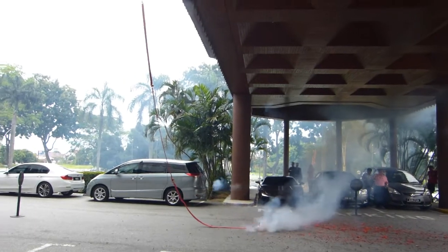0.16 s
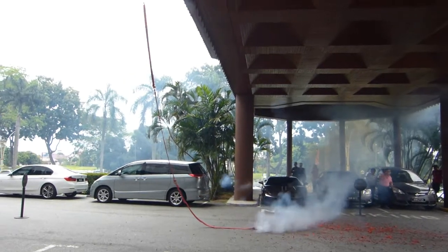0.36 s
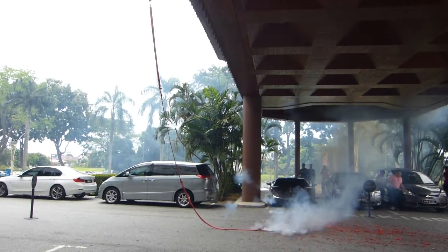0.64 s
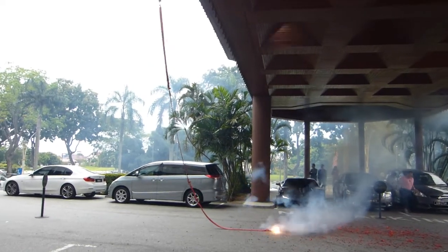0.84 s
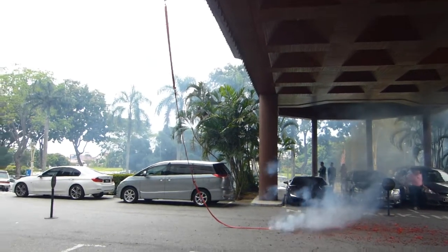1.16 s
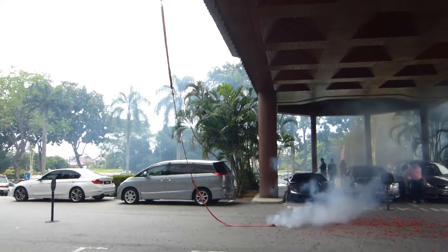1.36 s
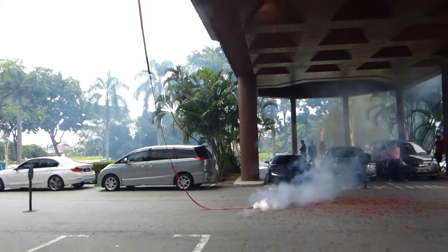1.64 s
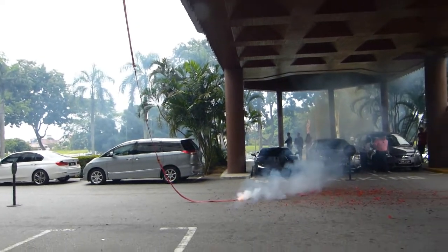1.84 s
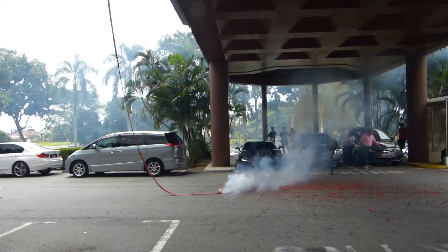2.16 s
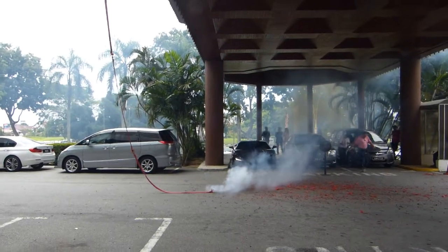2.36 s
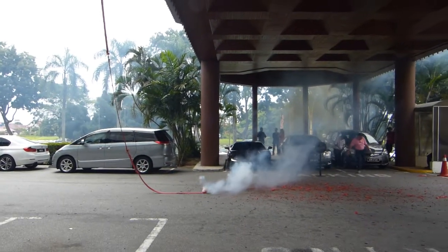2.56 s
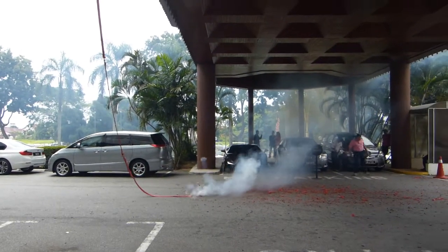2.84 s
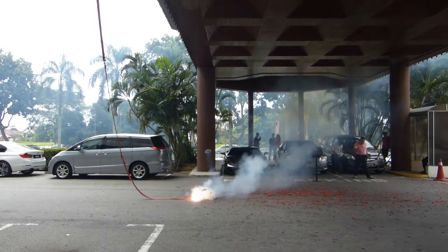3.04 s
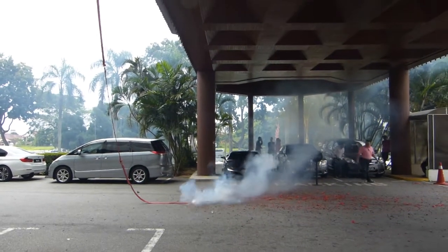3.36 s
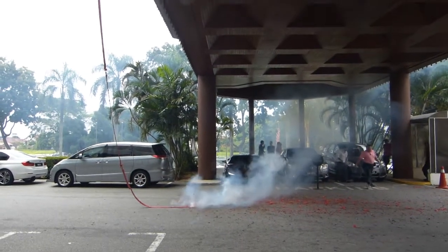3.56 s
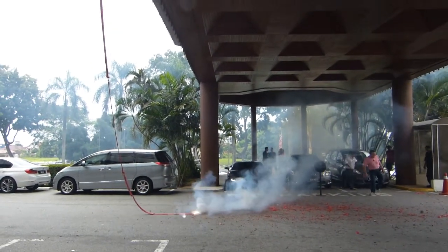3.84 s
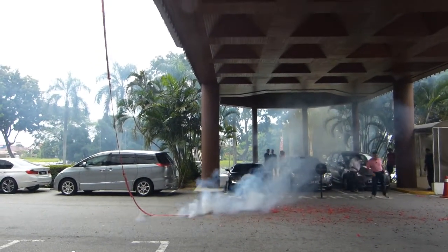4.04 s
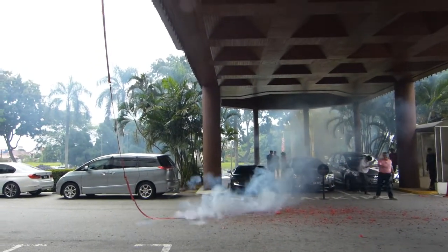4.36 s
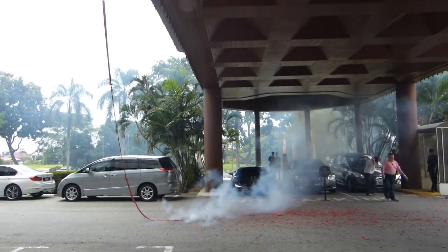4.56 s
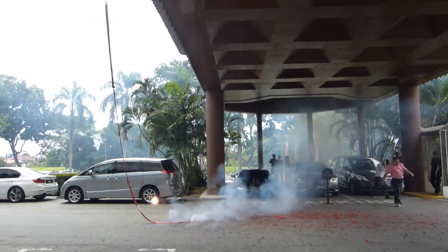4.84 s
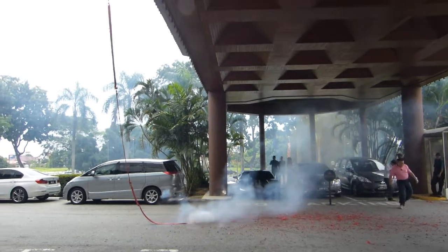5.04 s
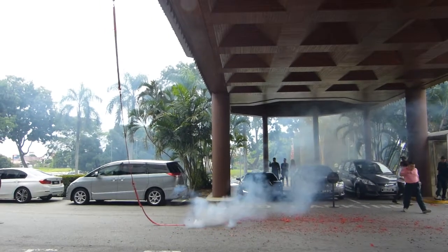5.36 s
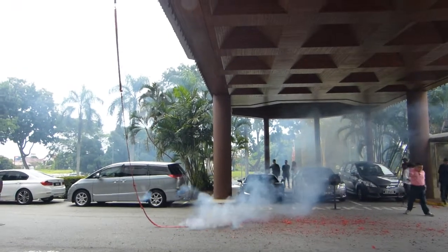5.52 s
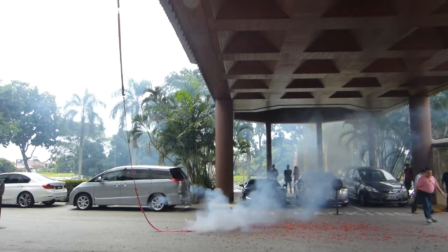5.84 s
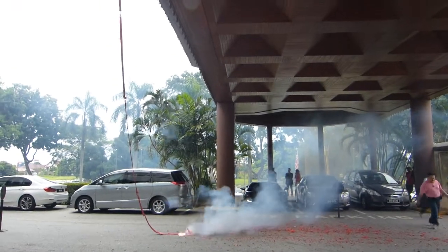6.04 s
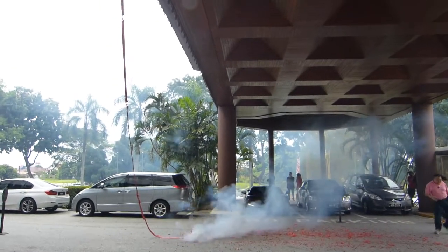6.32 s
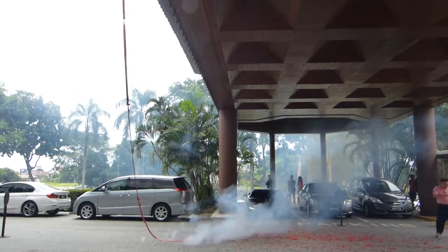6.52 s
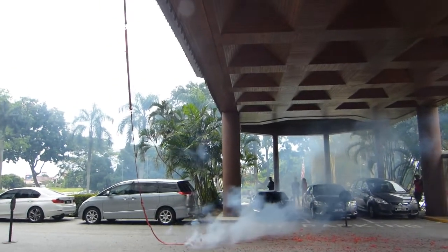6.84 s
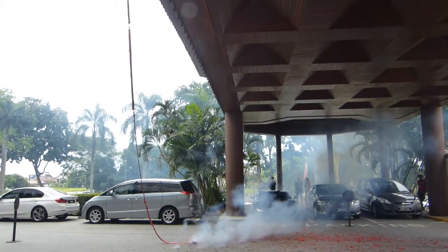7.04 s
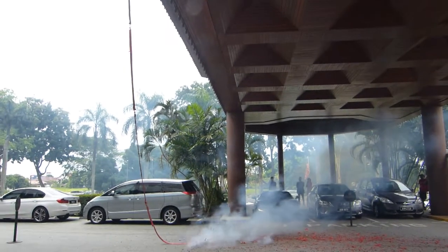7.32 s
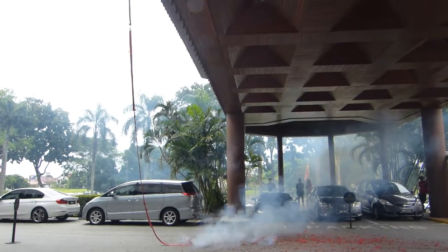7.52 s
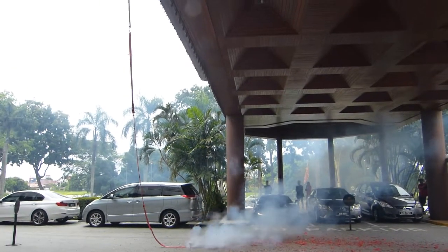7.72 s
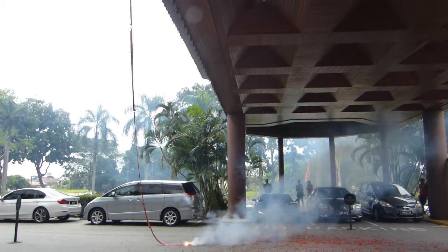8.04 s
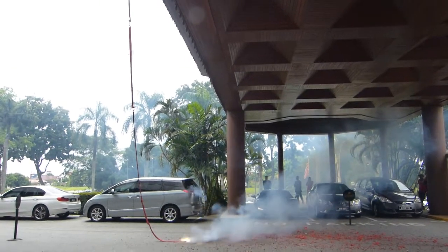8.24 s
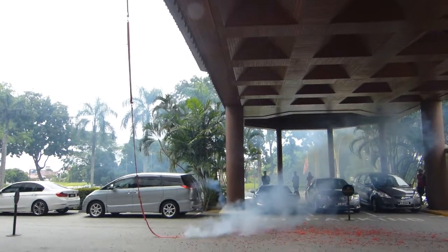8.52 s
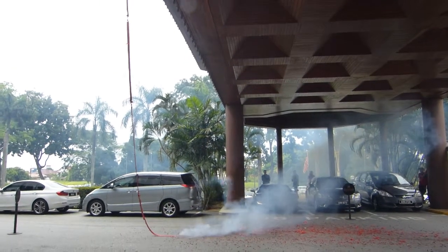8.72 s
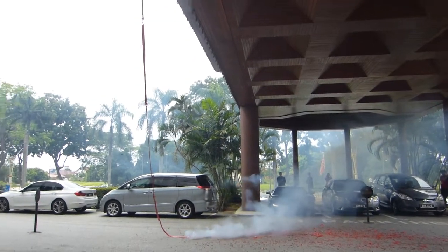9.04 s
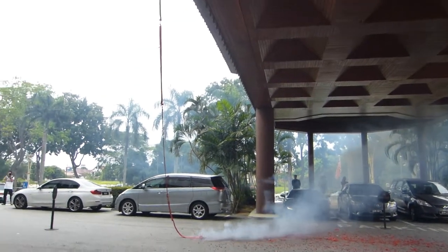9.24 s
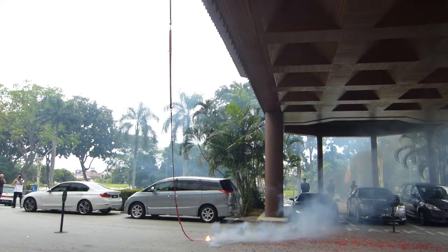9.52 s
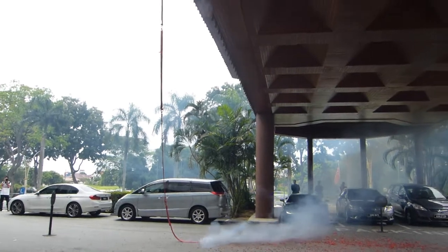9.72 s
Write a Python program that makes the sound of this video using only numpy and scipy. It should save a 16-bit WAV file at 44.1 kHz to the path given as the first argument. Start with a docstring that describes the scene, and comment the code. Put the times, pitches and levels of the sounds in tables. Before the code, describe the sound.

Firecrackers go off one after another on tarmac beneath a concrete porch, some metres from a stereo camera. The bangs are dense and uneven, roughly twenty a second, some paired or clustered, some much louder. Each sharp crack is followed at once by a hard roof slap and a short bright reverberation. The rattle is already going at the start and never stops.

```python
"""A string of firecrackers burns on the tarmac under a concrete porch roof, some metres from a stereo camera.
Each cracker sends an N-shaped shock: straight, off the ground and cars, off the roof, off its coffers and the
far wall. The porch and forecourt ring on as noise that dies band by band, over a faint low noise floor.
The difference of the camera's two ports widens the bass; the camera rounds the loudest peaks and cuts the top."""
import sys
import numpy as np
from scipy import signal
from scipy.fft import rfft, irfft
from scipy.io import wavfile
from scipy.ndimage import uniform_filter1d

SR = 44100
rng = np.random.default_rng(int(sys.argv[2]) if len(sys.argv) > 2 else 0)


def digitize_waveform(pressure):
    """Quantize a signal to 16-bit integers and store it at the path in sys.argv[1].

    Rows of a 2-D input are taken as channels; values are limited to [-1, 1].
    """
    field = np.atleast_2d(pressure).T
    bounded = np.clip(field, -1, 1)
    quanta = np.round(bounded * 32767).astype(np.int16)
    wavfile.write(sys.argv[1], SR, quanta)


N = 435708
LEAD = SR // 4  # samples computed ahead of the start, for crackers that still ring then


def undb(db):
    """Turns a level in dB into a gain."""
    return 10 ** (np.asarray(db, float) / 20)


def colour(x, table):
    """Causal (minimum-phase) filter with the gain of (Hz, dB) points, from the folded cepstrum."""
    hz, db = np.transpose(table)
    size = 4096
    bins_hz = np.arange(1, size // 2 + 2) * SR / size
    log_gain = np.log(undb(np.interp(np.log(bins_hz), np.log(hz), db)))
    # folding the cepstrum onto positive times makes the response causal
    cepstrum = irfft(log_gain)
    cepstrum[1:size // 2] *= 2
    cepstrum[size // 2 + 1:] = 0
    response = irfft(np.exp(rfft(cepstrum)))
    return signal.fftconvolve(x, response)[:len(x)]


def crackers():
    """Every cracker and the smaller neighbour that it lights: time, strength, treble, straight crack."""
    # one row per cracker; the first rows go off before the start and still ring:
    # t/s, strength level/dB, treble against body level/dB, straight crack level/dB
    bangs = [(-.16,-16,0,-9),(-.09,-18,0,-9),(-.05,-8.5,1,-5),(-.02,-13,-6,-11),(.0018,-17.5,-0.5,-12),(0.0158,-17,-3,-9),(0.0396,-15.5,-4,-15),(0.0583,-14.5,-2.5,-10),(0.0963,-17.5,2,-11),(0.1242,-15,0.5,-6),(0.166,-24,2,-9),(0.1915,-14,-2.5,-9),(.2084,-17,0,-9),(.279,-15,-2,-9),(0.2977,-15,-1,-9),(0.325,-17,-2,-10),(0.3289,-16.5,2,-9),(0.3904,-11.5,-1,-8),(0.409,-19,0.5,-11),(.4335,-16.5,1.5,-8),(0.5071,-18.5,4.5,-6),(.5967,-13,-3.5,-10),(0.6174,-24,-3,-11),(0.659,-12,0,-15),(0.6679,-20,-7,-15),(0.6944,-13,-2,-8),(0.7056,-19,2,-9),(0.716,-19,-3,-11),(0.7211,-17.5,1,-6),(.7484,-27,9,-10),(0.8543,-14.5,-1.5,-7),(0.9433,-16,-0.5,-7),(.9702,-15,-2.5,-8),(.9898,-19,1,-9),(1.0959,-13.5,-1,-7.5),(1.1317,-24,8,-11),(1.1413,-11.5,-4,-5),(1.2299,-19,5,-10),(1.2403,-17,-1,-6),(1.3856,-13.5,0,-6),(1.4074,-12.5,-4.5,-12),(1.4165,-17.5,1,-11),(1.518,-14.5,-4.5,-3.5),(1.5745,-18.5,1.5,-7),(1.6847,-16,1.5,-7.5),(1.7241,-18,3,-10),(1.7338,-18.5,-6,-13),(1.7432,-12.5,-7,-5),(1.7652,-21,-3,-14),(1.8869,-17.5,1,-5),(2.0764,-16.5,2.5,-5.5),(2.1532,-10.5,-4,-6),(2.2946,-13.5,-5,-6),(2.3168,-20.5,2.5,-11),(2.4193,-15.5,-0.5,-9),(2.4662,-16.5,-0.5,-5),(2.502,-20,1,-18),(2.5641,-20.5,4,-9),(2.5806,-17,-1.5,-10),(2.6735,-29,11,-19),(2.698,-22.5,5,-23),(2.7335,-23.5,7.5,-11.5),(2.7507,-16,3.5,-11),(2.7788,-20,3,-12),(2.7934,-13.5,-1,-6),(2.8456,-23,6.5,-14),(2.8881,-18.5,4.5,-11),(2.9172,-18.5,1,-13),(2.9621,-19,4,-11),(3.0141,-7.5,-5.5,-7),(3.0281,-18,-7,-5),(3.0351,-21,-3,-11),(3.1349,-11.5,-3,-4),(3.1893,-20,3,-8),(3.209,-8,-3,-3),(3.2357,-18.5,2,-5),(3.2637,-18,0,-11),(3.3234,-16.5,-2,-6),(3.3543,-18.5,0.5,-16),(3.3602,-16.5,-1,-11),(3.3836,-33,-3,-18),(3.4768,-22.5,-5,-8),(3.538,-16,.5,-3.5),(3.5709,-11,-2.5,-11),(3.5905,-19,-5,-8),(3.8299,-13.5,-2.5,-4),(3.912,-17.5,2.5,-8),(3.9279,-14,-2,-8),(4.0067,-14.5,-1.5,-4),(4.044,-21,6.5,-9),(4.0573,-21.5,1,-9),(4.2037,-19.5,5,-7),(4.2106,-13.5,-0.5,-9),(4.2457,-15.5,3.5,-3),(4.2672,-18.5,4.5,-10),(4.3026,-19,5,-17),(4.3185,-11.5,-5,-19),(4.3291,-13.5,-0.5,-5),(4.3985,-25,0,-7),(4.4051,-20,0,-13),(4.5078,-17,1,-3.5),(4.5272,-18.5,1,-6),(4.6248,-15.5,1.5,-4),(4.6303,-21,6.5,-14),(4.6474,-22,1,-7),(4.8249,-21,5.5,-7),(4.8555,-16,1.5,-6),(4.8648,-17,3,-10),(4.9373,-17.5,1,-10),(4.9841,-16,-.5,-8),(5.0292,-16,2,-3),(5.1359,-16,-1,-6.5),(5.1676,-22.5,5.5,-8.5),(5.216,-14.5,1,-7),(5.2384,-16.5,0,-5),(5.2482,-18,-5,-4),(5.325,-12.5,-0.5,-9),(5.3294,-23,2,-7),(5.3485,-13.5,-1,-11),(5.4774,-16,-1.5,-4),(5.4818,-12,-2.5,-4),(5.5132,-15,3.5,-9),(5.526,-21,2,-10),(5.5548,-19,1,-5),(5.566,-19.5,2,-9),(5.6203,-17.5,6,-10),(5.6433,-19,4,-14),(5.6945,-17.5,1,-10),(5.8625,-17.5,2.5,-4.5),(5.8797,-19.5,1.5,-8),(5.9005,-19,3.5,-8),(5.9238,-21.5,12,-8),(5.9636,-13.5,-4.5,-3.5),(6.0948,-16,-0.5,-7.5),(6.1162,-18.5,-0.5,-13),(6.1393,-18,-2,-6),(6.1835,-20.5,7,-16),(6.2387,-14,-0.5,-9),(6.2421,-18.5,2,-9),(6.3352,-18,0.5,-7),(6.3402,-19,0,-7),(6.442,-22,4,-22),(6.4793,-15.5,3.5,-7.5),(6.492,-22,6,-13),(6.516,-24,2,-17),(6.5558,-17.5,1,-5),(6.588,-20,-1,-7),(6.7918,-21,3.5,-11.5),(6.8254,-13.5,-1,-7),(6.8715,-20,2.5,-14),(6.902,-15,2.5,-4),(6.9912,-17,2.5,-9),(7.0541,-18.5,0,-7),(7.1145,-16.5,2,-5),(7.1572,-16,1.5,-6),(7.1706,-11.5,-0.5,-10),(7.2422,-17.5,2.5,-10),(7.251,-14.5,-3,-16),(7.2815,-15,2,-6),(7.3104,-24,4,-11),(7.38,-20,5.5,-10),(7.4336,-20,6,-6),(7.46,-20,1,-8),(7.506,-17,3,-18),(7.5163,-23,1.5,-8),(7.543,-16.5,0,-4),(7.6671,-12.5,-1.5,-5),(7.6795,-17.5,2,-3),(7.7231,-16.5,1,-5.5),(7.8979,-29,2,-24),(7.9687,-16,2.5,-4),(7.989,-18.5,3,-5),(8.088,-23,-1,-24),(8.1372,-14,-4.5,-5),(8.1562,-18.5,6,-7),(8.1891,-17.5,1.5,-10),(8.1943,-20,0,-5),(8.2181,-20.5,3,-7),(8.3362,-16.5,1,-4),(8.368,-21,2,-6),(8.412,-19,1.5,-4),(8.4834,-22,4,-6),(8.526,-20.5,3.5,-6),(8.563,-19,2,-3),(8.6321,-21.5,2,-8),(8.6392,-22.5,8.5,-9),(8.7037,-22,7,-9),(8.7656,-14.5,1,-6),(8.9259,-19.5,1.5,-26),(8.964,-19,3,-5.5),(8.9771,-14.5,0,-6),(9.024,-20,2,-8),(9.0663,-15,-2.5,-5),(9.153,-22.5,6.5,-8),(9.1912,-17,1.5,-17),(9.2123,-20,6,-8),(9.2433,-14,-5,-6),(9.2634,-24,5.5,-8),(9.3087,-21,5.5,-6),(9.3411,-21.5,1,-14),(9.4406,-16.5,3.5,-9),(9.4699,-18,-2,-11),(9.4972,-16,5,-12),(9.6145,-18,0.5,-9),(9.7418,-23,0,-15),(9.834,-14.5,2,-4.5),(9.8593,-21.5,-3,-8)]
    mean_wait_ms, neighbour_db, neighbour_scatter_db = 5, -12.5, 4
    s, db, treble_db, crack_db = np.transpose(bangs)
    wait_s = mean_wait_ms / 1000 * rng.exponential(size=len(s))
    less_db = neighbour_db + neighbour_scatter_db * rng.standard_normal(len(s))
    all_s = np.r_[s, s + wait_s]
    all_db = np.r_[db, db + less_db]
    all_treble_db = np.r_[treble_db, treble_db]
    all_crack_db = np.r_[crack_db, crack_db + .7 * less_db]
    return all_s, all_db, all_treble_db, all_crack_db


def shocks(s, db, group, count):
    """N-waves of one group of paths, mid and side: a jump down, a bowed ramp up, a jump back into suction."""
    typical_length_ms, bow = .36, 1.6
    front, front_ms = .8, .06  # depth of the first jump and its decay
    suction, suction_ms = .6, .3  # depth after the last jump and its decay
    after_ms, spread_ms, path_db, edge_ms, scatter_db, side = group
    chance = rng.standard_normal((len(s), 4 * count)).reshape(-1, 4).T
    late, longer, louder, aside = chance
    length = typical_length_ms * np.exp(.13 * longer)[:, None]

    # the last jump of each wave marks its arrival
    end = LEAD + (np.repeat(s, count) + (after_ms + spread_ms * late) / 1000) * SR
    gain = undb(np.repeat(db, count) + path_db + scatter_db * louder)
    place = end.astype(int)[:, None] + np.arange(-32, 64)
    t = (place - end[:, None]) * 1000 / SR + length  # ms since the first jump

    begun = (1 + np.tanh(t / edge_ms)) / 2
    over = (1 + np.tanh((t - length) / edge_ms)) / 2
    ramp = np.clip(t / length, 0, 1) ** bow - front * np.exp(-np.abs(t) / front_ms)
    tail = suction * np.exp(-np.abs(t - length) / suction_ms)
    wave = gain[:, None] * ((begun - over) * ramp - over * tail)

    # single paths keep their bearing, scattered ones come from either side
    bearing = side * (1 + .5 * aside) if count == 1 else side * aside
    place = np.clip(place, 0, LEAD + N).ravel()
    mid_and_side = (wave, wave * bearing[:, None])
    return np.array([np.bincount(place, w.ravel(), LEAD + N + 1)[:-1] for w in mid_and_side])


def hollow(x):
    """The hollow coffers ring briefly when the roof echo strikes them: a short decaying sine is added."""
    pitch_hz, t60_ms, level_db = 1425, 6.2, -23.5
    t = np.arange(SR // 20) / SR
    ring = np.sin(2 * np.pi * pitch_hz * t) * undb(level_db - 60000 * t / t60_ms)
    return x + signal.fftconvolve(x, ring[None])[:, :x.shape[1]]


def all_shocks(s, db, treble_db, straight_db):
    """Shocks along every path from the string to the microphones: whole ones and scattered ones, mid and side."""
    # groups of arrivals: after their reference t/ms, spread t/ms, path level/dB, edge t/ms,
    # scatter level/dB, side share [ratio]
    straight = (0.08, 0.0031, 1.4, 0.023, 0, -0.62)
    ground_cars = (1.8, 0.483, 1.3, 0.02, 2.1, 1.3)
    roof = (.09, 0, 3.5, .07, 0, -.1)
    roof_edges = (1.7, 0.83, 1.4, 0.015, 5, 1.4)
    coffers = (0.386, 0.73, 4.1, 0.017, 4.2, 0.41)
    far_wall = (31.5, 2.5, 1.5, .04, 4, .2)
    # echoes come sooner as the fire creeps along the string: t/s, roof lag t/ms, coffer lag t/ms
    lags = [(0, 7.7, 14.5), (1.5, 7.68, 14.6), (2.5, 7.53, 14.4), (4.5, 7.32, 13.4), (9.9, 7.27, 13.1)]
    # small surfaces throw back mostly treble: f/Hz, level/dB
    small_surfaces = [(100, -12.5), (500, -3.5), (1500, -10), (3000, -0.5), (4100, 1), (8000, 3.5),
                      (12000, 1.5)]
    roof_lag_scatter_ms = .07
    roof_base_db, roof_growth_db_per_s, roof_scatter_db = 0.5, 0.27, 2.5

    # the roof echo grows along the string as the fire nears
    roof_db = (db + straight_db) / 2 + roof_base_db + roof_growth_db_per_s * s
    roof_db = roof_db + roof_scatter_db * rng.standard_normal(len(s))
    when, roof_ms, coffer_ms = np.transpose(lags)
    # the roof lag varies a little from cracker to cracker
    roof_lag_ms = np.interp(s, when, roof_ms) + roof_lag_scatter_ms * rng.standard_normal(len(s))
    roof_s = s + roof_lag_ms / 1000
    coffer_s = s + np.interp(s, when, coffer_ms) / 1000
    sharp_db = db + treble_db

    whole = shocks(s, straight_db, straight, count=1)
    whole += hollow(shocks(roof_s, roof_db, roof, count=1))
    broken = shocks(s, sharp_db, ground_cars, count=5)
    broken += shocks(roof_s, sharp_db, roof_edges, count=5)
    broken += shocks(coffer_s, sharp_db, coffers, count=5)
    broken += shocks(s, db, far_wall, count=8)
    return whole + np.array([colour(v, small_surfaces) for v in broken])


def space():
    """Response of porch and forecourt from one spot: echoes thicken to noise, each band dies at its rate."""
    # decay by band: f/Hz, t60 under the roof t/s, t60 of the forecourt t/s
    decay = [(113, 0.062, 0.082), (185, 0.25, 0.3), (370, 0.42, 2.2), (690, 0.45, 1.42), (1310, 0.48, 1.13),
             (3000, 0.26, 1.1), (6450, 0.43, 1.17), (12000, 0.36, 0.59)]
    forecourt_db, build_ms = -10, 7.85
    sparse_db, dense_ms = 7.5, 46  # early unevenness of the echoes, and how fast it evens out
    patchy_db = 2.5
    t = np.arange(SR) / SR
    echoes, uneven = rng.standard_normal((2, SR))
    x = echoes * undb(sparse_db * np.exp(-t * 1000 / dense_ms) * uneven)
    build_up = 1 - np.exp(-t * 1000 / build_ms)
    x *= build_up / np.sqrt(uniform_filter1d(x ** 2, size=3000))

    # each spot favours other pitches, in patches a third of an octave wide
    log_f = np.log(np.arange(1, SR // 2 + 2))
    patches = np.linspace(np.log(200), np.log(12000), num=18)
    favour = rng.standard_normal(len(patches))
    spectrum = rfft(x) * undb(patchy_db * np.interp(log_f, patches, favour))

    centres, short_s, long_s = np.transpose(decay)
    out = 0
    for k, share in enumerate(np.eye(len(decay))):
        # the powers of the two decays add
        roof_power = undb(-120 * t / short_s[k])
        forecourt_power = undb(2 * forecourt_db - 120 * t / long_s[k])
        band = irfft(spectrum * np.interp(log_f, np.log(centres), share), SR)
        out = out + np.sqrt(roof_power + forecourt_power) * band
    return out


def ringing(s, db, treble_db, table, level_db):
    """Crackers go off at several spots in turn, each with its own response of the space."""
    treble_hz, spots = 2600, 6
    low = signal.butter(2, treble_hz, fs=SR, output="sos")
    high = signal.butter(2, treble_hz, "high", fs=SR, output="sos")
    out = 0
    for spot in range(spots):
        here = slice(spot, None, spots)
        place = (LEAD + s[here] * SR).astype(int)
        body = np.bincount(place, undb(db[here]), LEAD + N)[:LEAD + N]
        crack = np.bincount(place, undb((db + treble_db)[here]), LEAD + N)[:LEAD + N]
        # the minus keeps the two halves from cancelling at the crossover
        kicks = signal.sosfilt(low, body) - signal.sosfilt(high, crack)
        out = out + signal.fftconvolve(kicks, space())[:LEAD + N]
    # the colour's own energy is divided out, so only its shape counts
    unit = colour(np.eye(1, 4096)[0], table)
    return undb(level_db) * colour(out, table) / np.sqrt(np.sum(unit ** 2))


def low_noise():
    """Faint low noise floor, below 40 Hz, independent left and right."""
    lowpass = signal.butter(4, 40, fs=SR, output="sos")
    noise = signal.sosfilt(lowpass, rng.standard_normal((2, N)))
    return undb(-72) * noise / noise.std()


def scene():
    """Shocks on their paths, the ringing space and a faint low noise floor, as left and right."""
    # microphone colour for the shocks, mid and side: f/Hz, level/dB
    mic_mid = [(60, -38), (150, -11.5), (400, -3), (1000, 0), (3000, -1), (8000, 2), (10000, -11.5),
               (12000, -3), (16000, -28)]
    mic_side = [(60, -29), (200, 2), (500, 3), (1200, -1), (4000, -16), (8500, -2), (12000, -13),
                (16000, -40)]
    # colour of the ringing space, mid and side: f/Hz, level/dB
    ring_mid = [(50, -76), (85, -30), (150, -2.5), (290, -10.5), (470, -7.5), (660, 0.5), (850, 1),
                (1400, 3.5), (2300, -2.5), (3640, -3), (4070, -0.5), (4450, -5.5), (8350, -4),
                (11200, -13.5), (15000, -47)]
    ring_side = [(18, -57), (30, -27), (64, -29), (189, -8.5), (473, -6), (1320, -1), (4420, -6.5),
                 (8300, -4.5), (11400, -11), (13700, -30), (16000, -56)]
    # the lower middle that leans to the right channel: f/Hz, level/dB
    lean_colour = [(100, -18), (600, 3), (2500, -16)]
    lean = -0.065  # share of the mid; negative leans right

    s, db, treble_db, straight_db = crackers()
    mid, side = all_shocks(s, db, treble_db, straight_db)
    mid = colour(mid, mic_mid) + ringing(s, db, treble_db, ring_mid, level_db=-6.5)
    side = colour(side, mic_side) + ringing(s, db, treble_db, ring_side, level_db=-13.5)
    side += lean * colour(mid, lean_colour)
    left_right = np.array([mid + side, mid - side])[:, LEAD:]
    return left_right + low_noise()


def record(dry):
    """The camera rounds the loudest peaks, dulls the top octave, sits slightly off zero and cuts the top."""
    ceiling, offset = 0.76, -.0039  # of full scale
    dull_hz, top_hz = 12000, 16000
    rounded = ceiling * np.tanh(dry / ceiling)
    soft = signal.sosfilt(signal.butter(3, dull_hz, fs=SR, output="sos"), rounded)
    return signal.sosfilt(signal.ellip(8, .2, 70, top_hz, fs=SR, output="sos"), soft + offset)


dry = scene()
out = record(dry)
digitize_waveform(out)
```